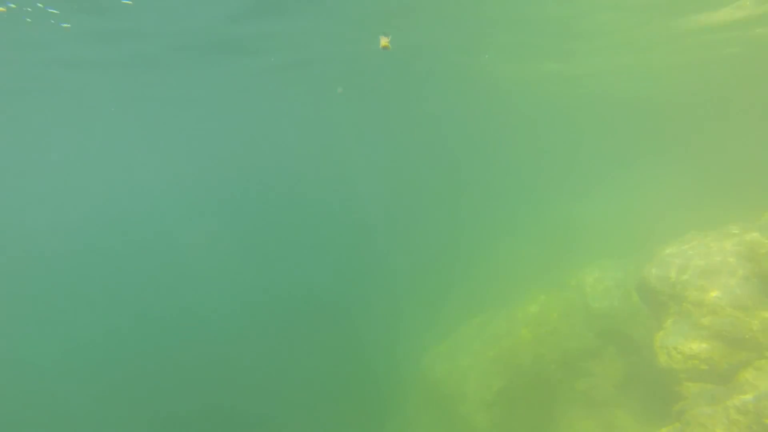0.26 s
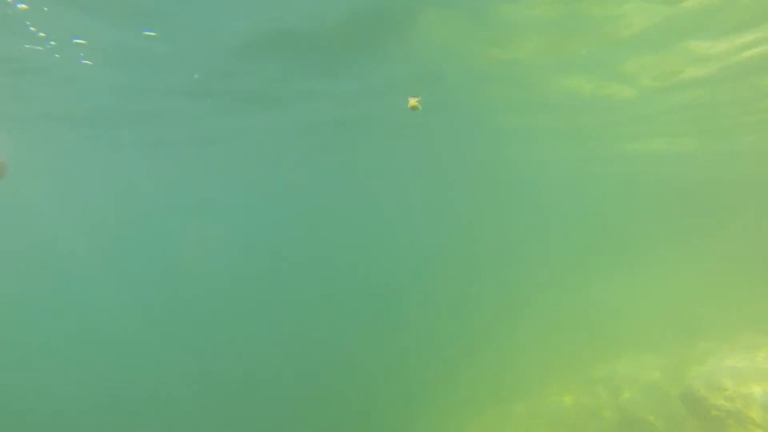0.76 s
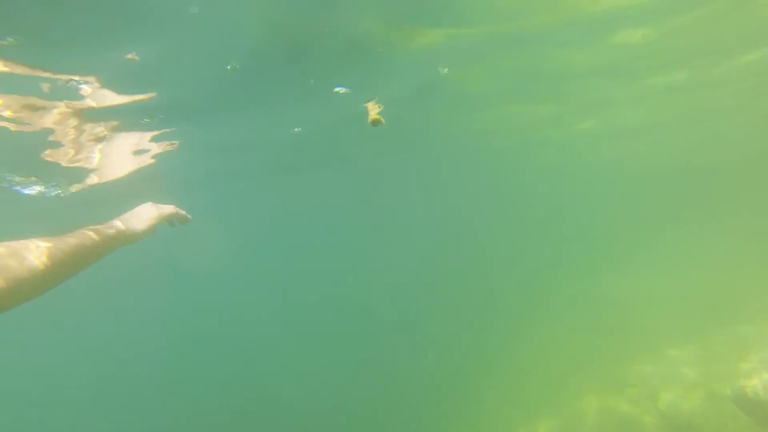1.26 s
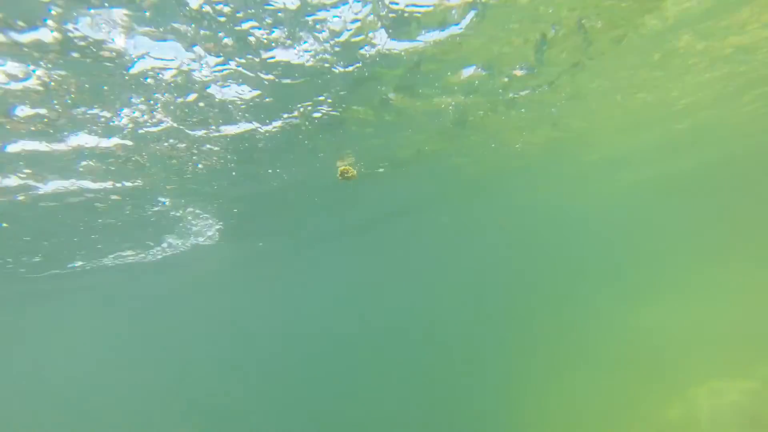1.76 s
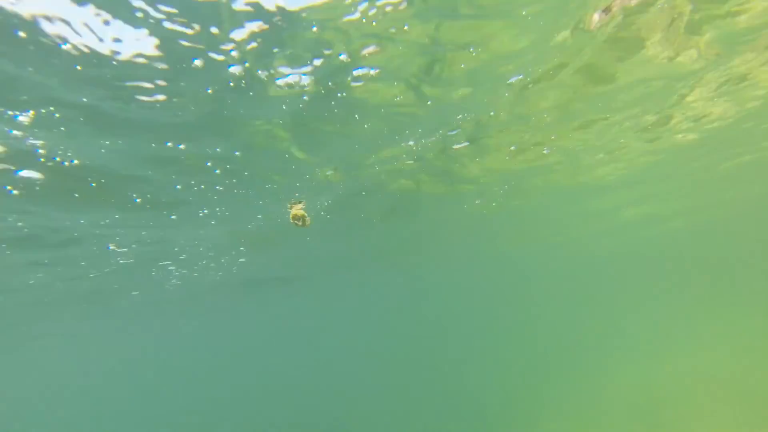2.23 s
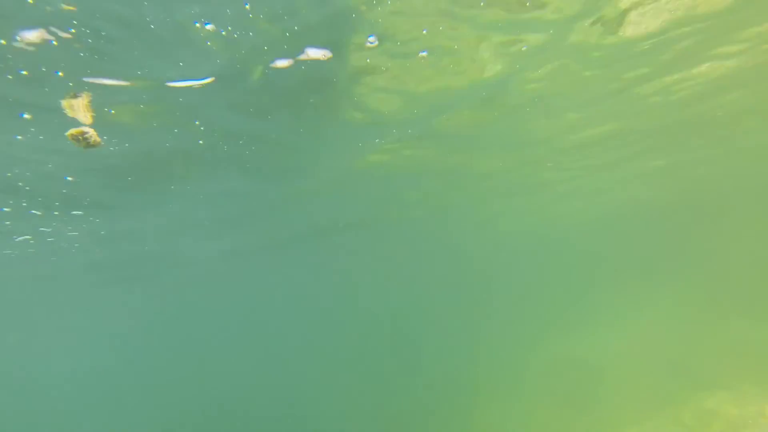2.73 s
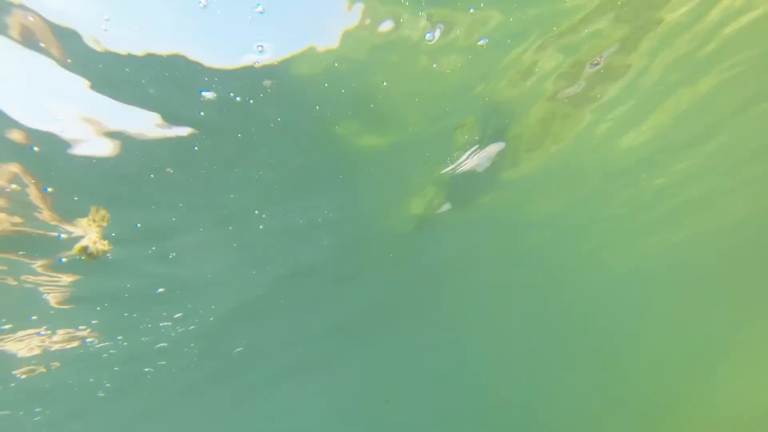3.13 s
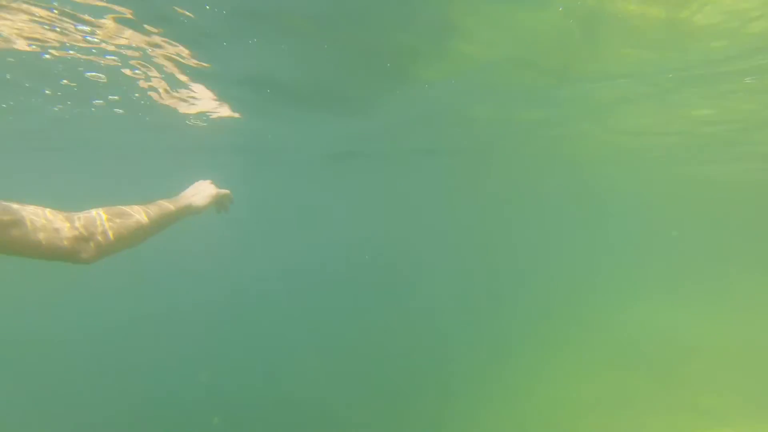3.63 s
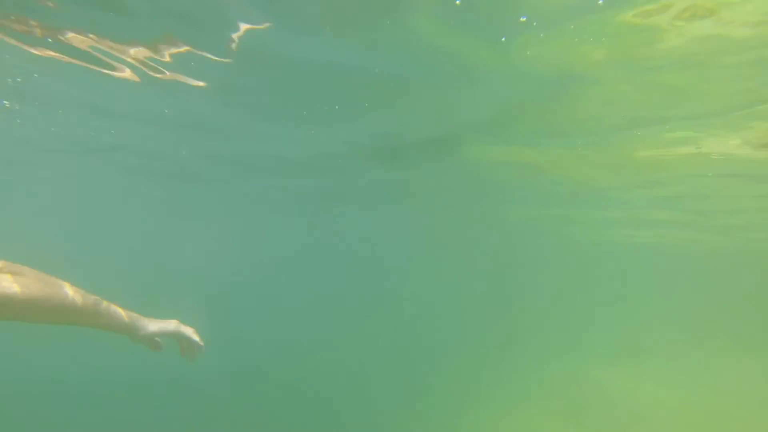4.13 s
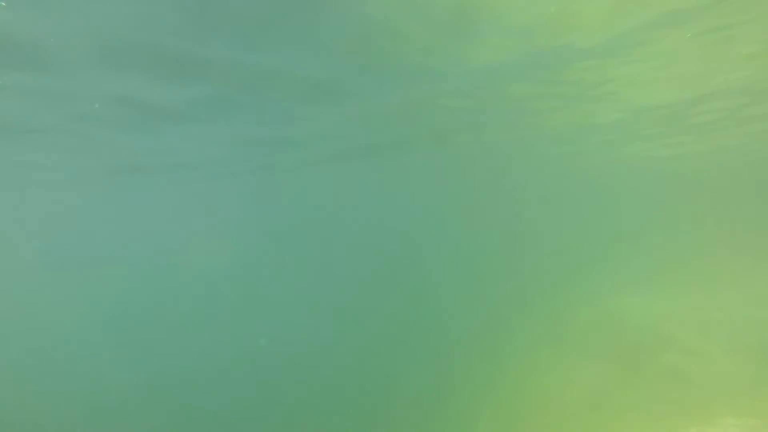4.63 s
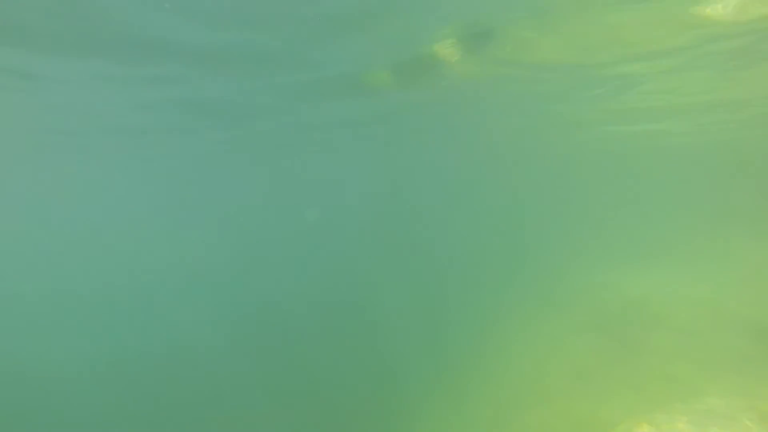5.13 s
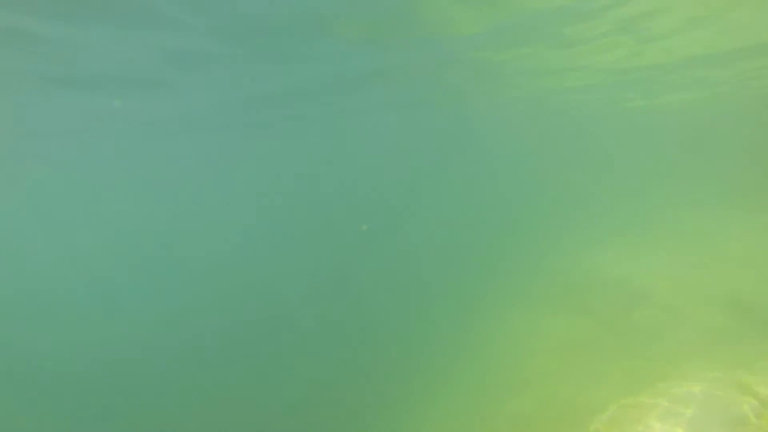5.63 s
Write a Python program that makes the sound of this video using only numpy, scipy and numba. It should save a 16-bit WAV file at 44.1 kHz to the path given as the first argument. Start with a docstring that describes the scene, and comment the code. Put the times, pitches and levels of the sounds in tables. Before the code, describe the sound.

Muffled underwater swishes and ringing bubbles, then heavy low thumps and knocks as a submerged camera housing moves through lake water.

```python
"""Soft watery swishes and ringing bubbles, then heavy thumps: a camera carried just under a lake's surface.
Its microphone sits in a sealed housing. Band-filtered noise makes the surges, eddies and chop on the shell;
gliding sines make the thumping air pockets and the bubbles, lone or in clouds stirred up by the strokes.
Short pulses make the mount tick and knock. A lake murmur and the hiss and whines of the electronics lie behind."""
import sys
import numpy as np
from scipy import signal
from scipy.fft import rfft, irfft
from scipy.io import wavfile
from scipy.ndimage import uniform_filter1d
from numba import njit

SR = 44100
rng = np.random.default_rng(int(sys.argv[2]) if len(sys.argv) > 2 else 0)


def unload_wav(signal):
    """Save mono or channel-first audio to the path in sys.argv[1] as 16-bit WAV at rate SR, clipped to [-1, 1]."""
    wavfile.write(
        sys.argv[1],
        SR,
        np.round(np.clip(np.atleast_2d(signal).T, -1, 1) * 32767).astype(np.int16),
    )


N = 259308  # samples, about 5.9 s
BUBBLE_GLIDE = 0.03  # share by which a bubble's pitch climbs over its t60


def undb(db):
    """Amplitude factor of a level in dB."""
    return 10 ** (np.asarray(db) / 20)


def level(x, db):
    """Set the RMS level in dB."""
    return x * undb(db) / np.sqrt(np.mean(x ** 2))


def band(x, lo_hz, hi_hz, order=2):
    """Keep what lies between two frequencies."""
    sos = signal.butter(order, [lo_hz, hi_hz], "bandpass", fs=SR, output="sos")
    return signal.sosfilt(sos, x)


def resonance(x, hz, width_hz):
    """One resonant mode, with unit gain at its peak."""
    b, a = signal.iirpeak(hz, hz / width_hz, fs=SR)
    return signal.lfilter(b, a, x)


def noise():
    """White noise for the whole scene."""
    return rng.standard_normal(N)


def walk(rate_hz):
    """Random levels held for 1 / rate and smoothed by two running averages; spread near 1."""
    hold = int(SR / rate_hz)
    steps = np.repeat(rng.standard_normal(N // hold + 1), hold)
    return 1.355 * uniform_filter1d(uniform_filter1d(steps, hold), hold)[:N]


def along(table):
    """Columns of a curve at every sample, with time in seconds as its first column."""
    s, *columns = np.transpose(table)
    return [np.interp(np.arange(N) / SR, s, column) for column in columns]


def db_sum(levels_db):
    """Level of unrelated sounds together: their powers add."""
    return 10 * np.log10(sum(undb(db) ** 2 for db in levels_db))


@njit
def rings(rows, glide, count):
    """Each row (sample, size, Hz, t60 s, rise s) is a fading sine that glides up by a share over its t60."""
    out = np.zeros(count)
    for at, size, hz, t60, rise in rows:
        phase, start = 0., int(at)
        for j in range(min(int(t60 * SR), count - start)):
            t = j / SR
            phase += 2 * np.pi * hz * (1 + glide * t / t60) / SR
            envelope = (1 - np.exp(-t / rise)) ** 2 * 1000 ** (-t / t60)
            out[start + j] += size * envelope * np.sin(phase)
    return out


def housing(x):
    """The shell and its trapped air ring at a few broad modes, with alternating sign."""
    # modes of the closed shell
    # Each row: pitch in Hz, width in Hz, gain at the peak in dB.
    shell_modes = [(304, 950, -15.5), (510, 154, 3), (763, 178, -1), (1038, 163, 1), (1418, 377, -1),
                   (1827, 388, -2), (2800, 380, -15), (3440, 300, -13), (5130, 220, -32)]
    out = 0
    for k, (hz, width_hz, gain_db) in enumerate(shell_modes):
        out = out + (-1) ** k * undb(gain_db) * resonance(x, hz, width_hz)
    return out


def flow(chop_db):
    """Water pushes on the shell in slow pressure swings, lumpy eddies, and a quick chop with fine spray."""
    # strength of the water on the shell
    # Each row: time in seconds, slow surge in relative dB, eddy flutter in relative dB.
    water_push = [(0.0, -52, -50.5), (0.21, -47.5, -46.5), (0.35, -47, -46), (0.46, -55, -55),
                  (0.6, -50.5, -49), (0.77, -55, -47.5), (0.95, -43, -40.5), (1.29, -54, -49.5),
                  (1.55, -47.5, -43), (1.7, -54.5, -64.5), (2.0, -50.5, -52), (2.42, -42, -55),
                  (2.69, -49, -66), (2.9, -41, -43.5), (3.19, -31.5, -34), (3.34, -27.5, -51),
                  (3.47, -39, -40), (3.6, -32, -35), (3.75, -41, -61), (3.93, -36.5, -48.5),
                  (4.14, -39.5, -42.5), (4.32, -49, -56), (4.62, -45, -41.5), (5.01, -46, -56),
                  (5.35, -51.5, -50.5), (5.55, -43.5, -62), (5.78, -54, -49), (5.88, -48, -62)]
    surge_db, eddy_db = along(water_push)

    swings = band(noise() * undb(2.5 * walk(9)), 4.2, 19.1, order=1)
    # the second filter also softens the changes of strength
    surge = band(undb(surge_db) * level(swings, 9.9), 3.0, 33.2, order=1)

    lumps = noise() * undb(4.23 * walk(22.05))
    eddies = level(band(lumps, 35.8, 96.3), 1.96)
    spray = band(noise() * undb(2.7 * walk(90)), 4300.0, 8900.0)
    chop = level(band(lumps, 47.0, 325.0), 1.2) + level(spray, -27.0)
    return surge + undb(eddy_db) * eddies + undb(chop_db) * chop


def swishes():
    """Every swish swells to its peak and dies away; returns levels of three bubble sizes and the chop."""
    # strokes that drag down bubbles
    # Each row: peak time in seconds, large bubbles in relative dB, rise in seconds, fall in seconds,
    # then dB above the large ones for small bubbles, fizz and chop.
    strokes = [(.26, -52.5, 0.074, 0.39, 3, -17, -8), (.34, -47, 0.29, 0.076, 0, -13, -4),
               (0.481, -58.5, 0.061, 0.14, 2, -7, 1), (0.621, -50.5, 0.011, 1.8, 5.5, 0, -16),
               (0.839, -42, 0.17, 0.37, 3, -15, -6.5), (.98, -42, 0.41, 1.5, -4.5, -26, -13),
               (1.47, -43.5, 0.35, 0.25, -28, -25, -7.5), (1.6, -48, 0.44, 0.037, -22, -29, -2),
               (2.318, -61.5, 0.48, 2.5, 0, -26, -4), (2.7, -52.5, 0.087, 0.13, 0.5, -9, 1.5),
               (2.86, -47, 0.11, 0.14, -3.5, -10, -2), (3.04, -48, 0.19, 0.15, -1, -5, -3),
               (3.09, -40, 0.087, 0.14, -1.5, -19, 0), (3.12, -48.5, 0.01, 0.085, -6, -1, -7),
               (3.139, -43, 0.068, 0.015, 0, 1, 0), (3.27, -44.5, 0.052, 0.83, -4, -11.5, -7),
               (3.32, -50.5, 0.18, 0.22, 0.5, -9, -5), (3.39, -43.5, 0.2, 0.1, 1, -10, 2.5),
               (3.57, -48, 0.15, 0.2, -7, -15, 7), (3.626, -45, 0.18, 0.2, -2.5, -8.5, -14),
               (4.0, -53, 0.15, 0.81, -3, -8.5, -3.5), (4.5, -47.5, 0.22, 0.19, -1.5, -9.5, 0),
               (4.675, -46.5, 0.13, 0.17, -1.5, -5, 0), (4.87, -46, 0.46, 0.22, -5, -17, -13.5),
               (5.3, -58.5, 0.97, 0.42, 2, -1.5, -3.5), (5.8, -51.5, 1, 0.42, -2.5, -11, -17)]
    # water between the strokes
    # One row: large bubbles, small bubbles, fizz and chop, all in relative dB.
    calm_water = (-64.5, -71.5, -69, -72)
    span_db = 20  # rise and fall are the times for this change

    t = np.arange(0, N + 64, 64) / SR  # a level every 64 samples
    layers = [np.array(calm_water)[:, None]]
    for s, large_db, rise, fall, *above_db in strokes:
        before, after = (s - t) / max(rise, .005), (t - s) / max(fall, .005)
        swell_db = large_db - span_db * np.where(t < s, before, after)
        layers.append(swell_db + np.array([0, *above_db])[:, None])
    return [np.interp(np.arange(N) / SR, t, db) for db in db_sum(layers)]


def swarm(lo_hz, hi_hz, churn_db, count=2600):
    """Bubbles of one size range over the churn that frees them, heard through the shell."""
    at, pitch, size, cycles = rng.random((count, 4)).T
    hz = lo_hz * (hi_hz / lo_hz) ** pitch
    gain = undb(np.minimum(-3.6 * np.log(1 - size), 13))  # mostly faint, a few up to 13 dB stronger
    t60 = (5.8 + 31.0 * cycles) / hz
    rise = np.full(count, .0005)
    pops = rings(np.array([at * N, gain, hz, t60, rise]).T, BUBBLE_GLIDE, N)
    churn = band(noise() * undb(1.66 * walk(40)), lo_hz, hi_hz)
    return level(level(housing(pops), 0) + level(housing(churn), churn_db), -5.0)


def cloud(large_db, small_db, fizz_db):
    """Each stroke drags down air in three sizes, in uneven spurts; small and fizz are relative to large."""
    large = swarm(342.0, 871.0, 0.33)
    small = swarm(886.0, 2185.0, -0.36)
    fizz = swarm(2054.0, 7100.0, 6.0)
    sizes = large + undb(small_db) * small + undb(fizz_db) * fizz
    spurts_db = 1.78 * walk(55)
    return undb(large_db + spurts_db) * sizes


def thumps():
    """Large air pockets squeezed and shoves on the shell; a pocket's pitch climbs as it rises."""
    # air pockets and shoves
    # Each row: start in seconds, size in dB before rise and fade, starting pitch in Hz,
    # time to fade 60 dB in seconds, rise in seconds, push 1 or pull -1.
    pockets = [(.818, -5, 53, 0.35, 0.008, -1), (.828, -5, 39, 0.064, 0.0027, 1),
               (2.032, -28, 63, 0.099, 0.003, -1), (2.051, -20, 19.6, 0.14, 0.0028, 1),
               (2.285, -28, 65, 0.068, 0.0013, 1), (2.686, -24, 47, 0.12, 0.0014, -1),
               (3.093, -14.5, 83, 0.097, 0.0016, -1), (3.126, -3, 20, 0.083, 0.0033, -1),
               (3.146, -4, 40, 0.075, 0.0014, 1), (3.318, -10.5, 50.8, 0.14, 0.0017, 1),
               (3.355, -5.5, 90, 0.037, 0.001, 1), (3.376, -4.5, 14, 0.12, 0.0019, -1),
               (3.401, 2, 45, 0.023, 0.0006, -1), (3.407, -2.5, 9.8, 0.092, 0.0024, 1),
               (3.534, -15.5, 47, 0.15, 0.0034, -1), (3.8, -23.5, 20, 0.2, 0.0023, 1),
               (4.392, -19, 65, 0.074, 0.00035, 1), (4.396, -14.5, 21.4, 0.16, 0.0017, -1),
               (4.664, -17.5, 22.7, 0.24, 0.00095, -1), (3.993, -15.5, 16.6, 0.14, 0.0025, 1),
               (5.752, -33, 50, 0.098, 0.002, 1), (5.82, -28, 32, 0.16, 0.002, -1)]
    s, db, hz, t60, rise, sign = np.transpose(pockets)
    size = np.sign(sign) * undb(db)
    pocket_glide = 0.75  # share by which the pitch climbs over the t60
    return rings(np.array([s * SR, size, hz, t60, np.maximum(rise, 1e-4)]).T, pocket_glide, N)


def bubbles():
    """Lone bubbles near the shell ring at the pitch of their size."""
    # single bubbles close to the microphone housing
    # Each row: start in seconds, size in dB before rise and fade, starting pitch in Hz.
    lone_bubbles = [(0.403, -51, 740), (0.183, -48, 1950), (0.322, -40.5, 502), (0.325, -39, 1200),
                    (0.618, -39, 1790), (0.682, -37.5, 1810), (0.76, -40, 1980), (0.786, -40, 1260),
                    (0.83, -31, 1045), (0.898, -32.5, 768), (0.902, -31.5, 1070), (0.925, -34, 690),
                    (0.938, -33, 1000), (0.957, -34, 1100), (0.975, -39, 557), (1.07, -36.5, 612),
                    (1.125, -39, 736), (1.182, -38.5, 514), (1.206, -39.5, 1957), (1.224, -36.5, 601),
                    (1.227, -44, 1920), (1.25, -38.5, 745), (1.28, -41, 777), (1.306, -50, 3800),
                    (1.335, -45, 610), (1.424, -44.5, 3660), (1.478, -41, 480), (1.51, -41, 890),
                    (1.259, -38, 1790), (1.308, -33, 1070), (1.317, -38, 2010), (1.336, -41, 1900),
                    (1.377, -36, 1840), (1.16, -48.5, 2380), (1.456, -38.5, 3250), (1.505, -41, 3620),
                    (1.433, -49, 3500), (1.522, -53, 2500), (1.533, -51, 3570), (1.409, -33.5, 1034),
                    (1.449, -34, 1187), (1.454, -32, 1026), (1.538, -31, 1583), (1.613, -36, 692),
                    (1.684, -42, 1860), (1.708, -24, 1631), (1.737, -26, 1046), (1.735, -32, 1905),
                    (1.768, -45, 1880), (1.824, -43, 925), (1.929, -46, 688), (2.398, -44.5, 1140),
                    (2.423, -43.5, 644), (2.938, -39, 1060), (3.248, -37.5, 672), (3.257, -49, 750),
                    (3.83, -41, 3500), (3.845, -44, 1300), (4.148, -48, 523), (4.49, -39, 450),
                    (4.701, -35, 475), (4.73, -40.5, 736), (4.734, -40.5, 1486), (4.77, -43, 703),
                    (4.663, -40, 1810), (4.685, -40, 1580), (4.8, -35, 1036), (4.8, -40, 776),
                    (4.825, -43, 1410), (4.83, -44, 568), (4.835, -43, 1740), (4.866, -32, 577),
                    (4.867, -32.5, 1042), (4.868, -37.5, 730), (4.918, -45, 1444), (5.346, -42, 740),
                    (5.354, -40.5, 1175), (5.411, -35.5, 674), (5.519, -43.5, 560), (5.563, -45, 752),
                    (5.563, -39, 1700), (5.7, -50, 553)]
    s, db, hz = np.transpose(lone_bubbles)
    t60 = 58.4 / hz  # in cycles of the starting pitch: small bubbles die sooner
    rise = np.full(len(s), .0012)
    return rings(np.array([s * SR, undb(db), hz, t60, rise]).T, BUBBLE_GLIDE, N)


def ticks(size=600):
    """A jolt rings the shell, duller the longer the contact; its sharp edge rattles on in the treble."""
    # ticks and knocks of the mount
    # Each row: start in seconds, jolt in dB before the shell, contact time in ms,
    # peak of the direct sharp edge in dB, edge pitch in Hz.
    knocks = [(.404, -33, 0.48, -53, 1900), (0.651, -29.5, 0.6, -44, 1600), (0.826, -20, 3.8, -39.5, 2700),
              (1.295, -48, 0.49, -44, 2800), (1.449, -28.5, 0.32, -39, 1790),
              (1.4924, -42, 0.25, -34, 3060), (1.377, -50, .3, -48, 3500), (1.684, -48, 0.15, -46, 2400),
              (1.42, -26.5, 3.6, -51, 3500), (1.519, -24, 3.3, -57, 2980), (1.538, -26.5, 0.58, -51, 2000),
              (1.708, -26.5, 0.44, -50, 2010), (2.693, -35, 0.41, -44, 1990), (2.853, -35, 0.91, -59, 3000),
              (3.024, -24, 0.45, -51, 4040), (3.063, -32, 4.3, -55, 3500), (3.089, -19, 2.15, -56, 2000),
              (3.103, -20, 1.7, -56, 5000), (3.122, -12, 3.1, -44, 3600), (3.1446, -11, 2.2, -41, 2180),
              (3.21, -43, 0.31, -50, 4460), (3.033, -32, 0.48, -48, 7200), (3.3, -38, 0.73, -52, 3600),
              (3.353, -24, 2, -58, 3000), (3.398, -18, 0.72, -31, 1730), (3.399, -35, 0.44, -38.5, 3640),
              (3.445, -23, 2.06, -60, 3000), (3.627, -18.5, 2.6, -45, 3000),
              (4.061, -22.5, 1.18, -42, 3580), (4.39, -30, 2.5, -64, 2000), (4.45, -23.5, 2.2, -57, 3000),
              (4.469, -50, 0.45, -43, 2600), (4.646, -19, 1.95, -43.5, 4800), (4.794, -27, 1, -46, 980),
              (4.866, -45, 0.86, -48, 2200), (5.768, -42, 0.3, -36, 2630), (5.854, -40, 0.62, -43, 1900)]
    t = np.arange(size) / SR
    body, edge = np.zeros((2, N))
    bursts = rng.standard_normal((len(knocks), size))
    for (s, jolt_db, contact_ms, edge_db, edge_hz), burst in zip(knocks, bursts):
        at = int(s * SR)
        jolt = np.sin(np.pi * np.clip(t * 1000 / contact_ms, 0, 1)) ** 2
        body[at:at + size] -= undb(jolt_db) * jolt
        click = np.exp(-t / 0.00006)
        rattle = 0.37 * burst * np.exp(-t / 0.0013)
        snap = band(click + rattle, 0.65 * edge_hz, 1.316 * edge_hz, order=3)
        edge[at:at + size] += undb(edge_db) * snap / np.abs(snap).max()
    # both reach the microphone directly and through the shell
    return undb(-0.5) * housing(body) + undb(-7.5) * body + edge + undb(-13.5) * housing(edge)


def lake():
    """The lake murmurs steadily behind: noise through the shell."""
    return level(housing(noise()), -67.5)


def electronics():
    """Preamplifier hiss, its level wavering slightly, with a few faint whines of narrow-band noise."""
    # colour of the hiss
    # Each row: frequency in Hz, relative density in dB per Hz.
    hiss_colour = [(1500, -13.5), (3000, 2.5), (6000, -6), (9000, -10), (12000, -11.5), (14500, -14),
                   (16000, -15)]
    # steady whines
    # Each row: pitch in Hz, width in Hz, RMS level in dB before the recorder.
    whines = [(9860, 11, -92), (11353, 110, -89), (13636, 38, -98), (14386, 25, -94)]

    hz, db = np.transpose(hiss_colour)
    f = np.arange(N // 2 + 1) * SR / N
    colour = undb(np.interp(np.log(f + 1), np.log(hz), db))
    hiss = level(irfft(rfft(noise()) * colour, N), -70.5)
    whine = sum(level(resonance(noise(), hz, width_hz), db) for hz, width_hz, db in whines)
    return hiss * undb(1.0 * walk(13)) + whine


def scene():
    """Everything that reaches the one microphone, from the water on the shell to the electronics."""
    large, small, fizz, chop = swishes()
    water = flow(chop) + cloud(large, small - large, fizz - large)
    mix = water + thumps() + bubbles() + ticks() + lake() + electronics()
    return mix[None]


def record(dry):
    """The recorder cuts the top steeply above 15250 Hz."""
    return signal.sosfilt(signal.ellip(10, .2, 70, 15250, fs=SR, output="sos"), dry)


dry = scene()
out = record(dry)
unload_wav(out)
```